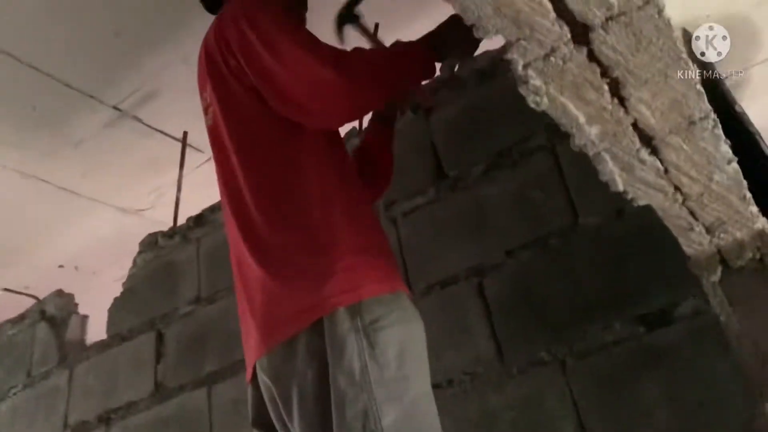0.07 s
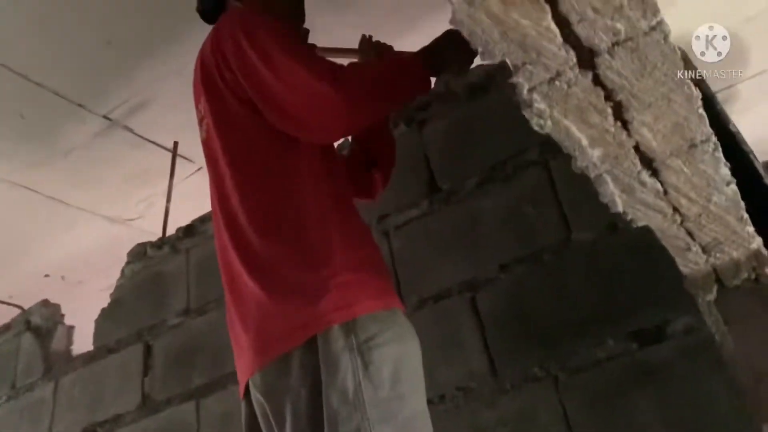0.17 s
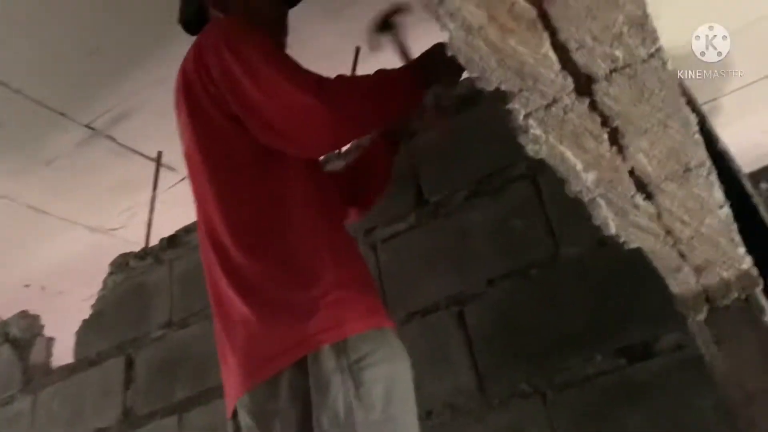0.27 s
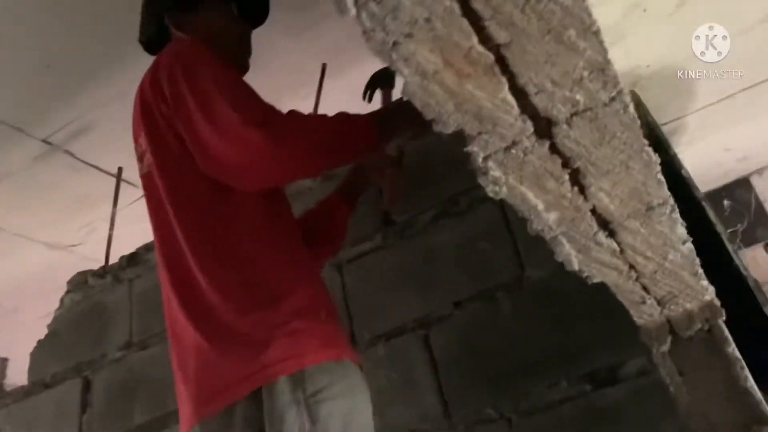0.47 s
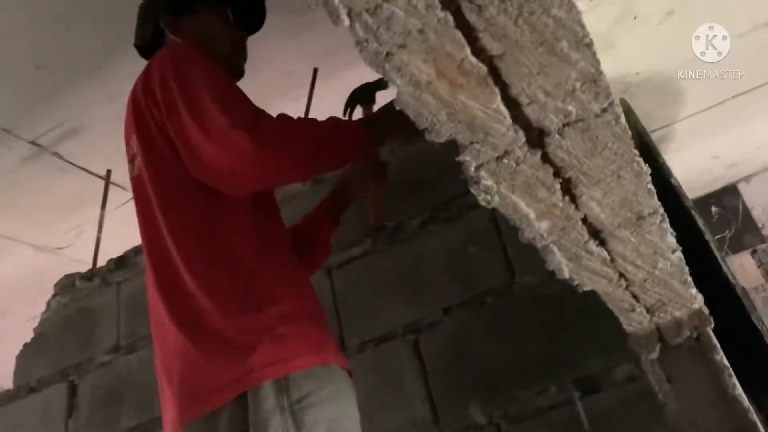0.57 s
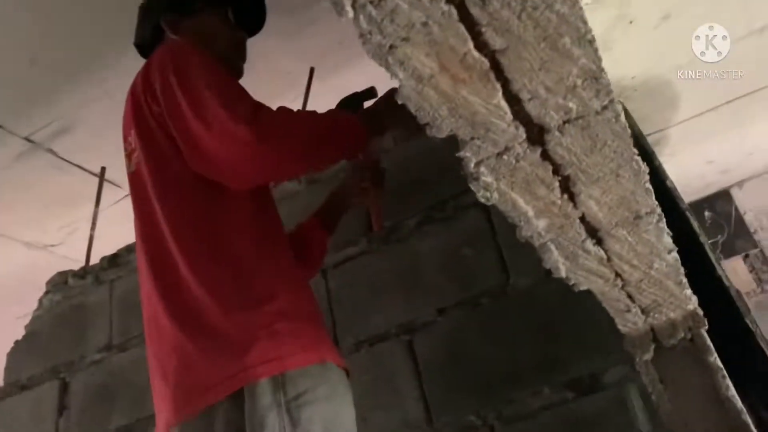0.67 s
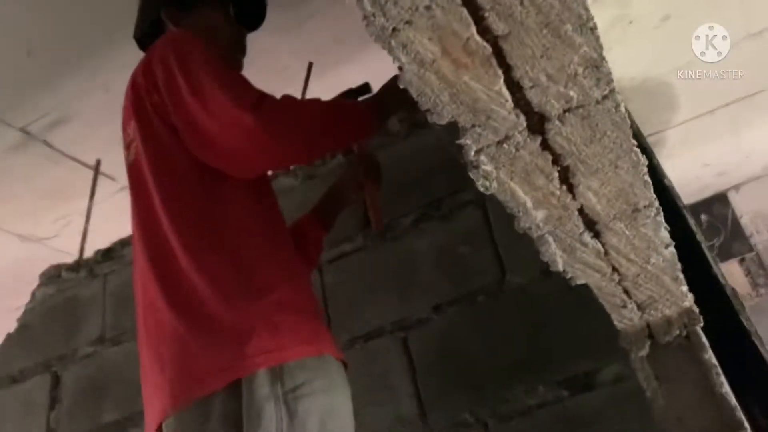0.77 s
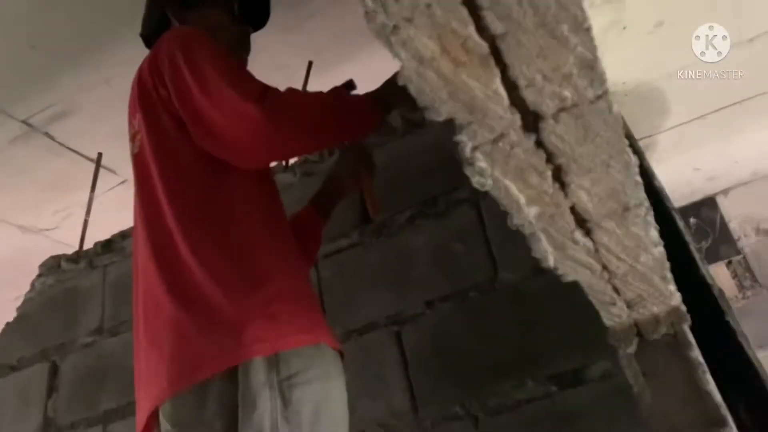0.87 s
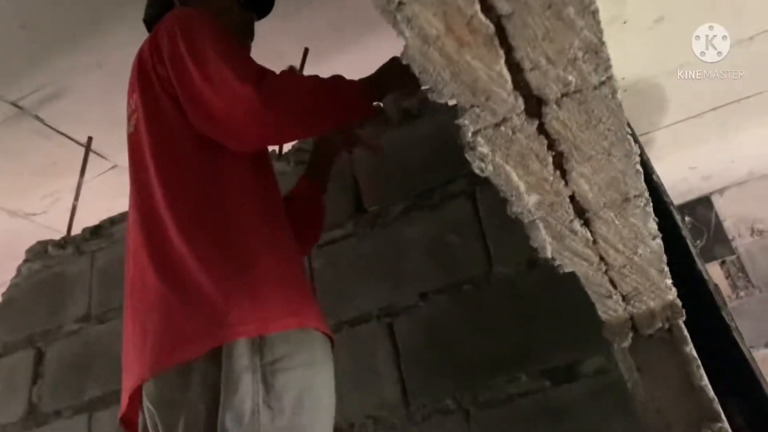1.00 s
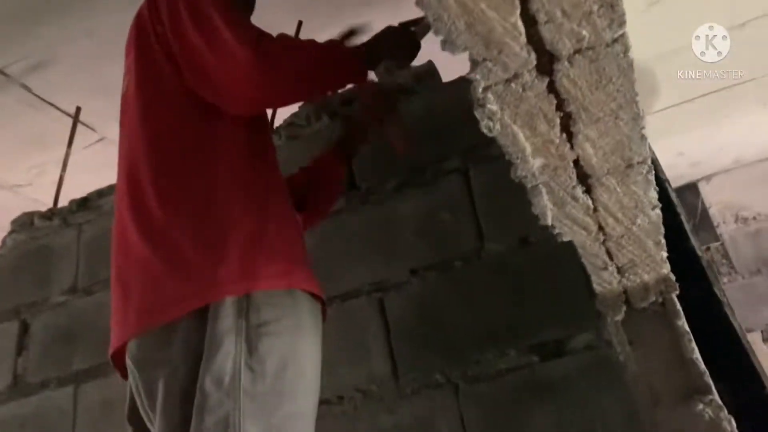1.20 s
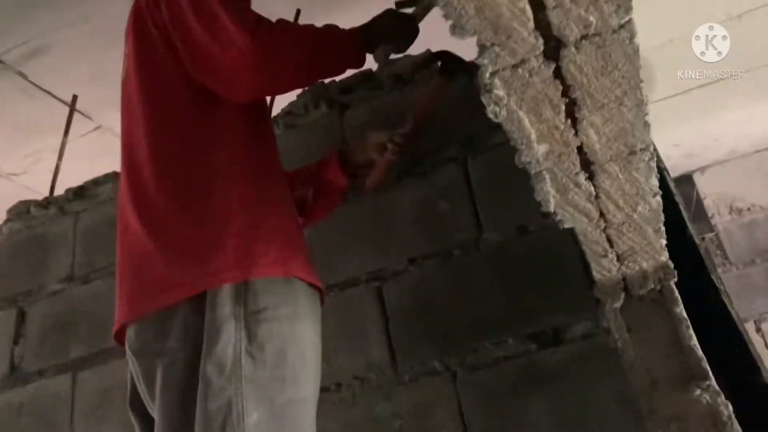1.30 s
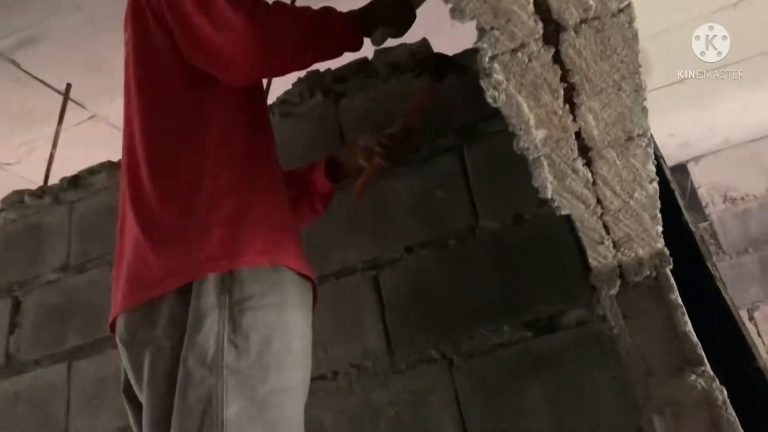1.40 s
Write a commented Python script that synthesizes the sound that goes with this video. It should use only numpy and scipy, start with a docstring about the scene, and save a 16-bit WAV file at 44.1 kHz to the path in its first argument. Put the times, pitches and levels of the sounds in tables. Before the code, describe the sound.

A hammer strikes a concrete-block wall twice up close, and chips and lumps trickle down.

```python
"""Two quick hammer blows break the top of a concrete-block wall, close by on a building site.
Mortar crunches in noise bursts, block and steel ring in decaying modes, the loosened block thuds.
Grit trickles, chips tick, lumps drop and crumble, a fragment falls into a hollow. Bare walls echo.
Behind it a far engine drones over a rumble and a thin whistle, perhaps an insect, swells twice."""
import sys
import numpy as np
from scipy import signal
from scipy.fft import rfft, irfft
from scipy.io import wavfile

SR = 44100
rng = np.random.default_rng(int(sys.argv[2]) if len(sys.argv) > 2 else 0)


def to_wav(sig):
    """Store sig (one row per channel, or 1-D mono) as 16-bit WAV at the path in sys.argv[1].

    Samples outside -1..1 are clipped; the rate is SR.
    """
    pcm = np.clip(np.atleast_2d(sig), -1, 1) * 32767
    pcm = np.round(pcm).astype(np.int16)
    wavfile.write(sys.argv[1], SR, pcm.T)  # frames by channels


N = 63945
TIME_S = np.arange(N) / SR
PORT_LAG_S, PORT_OWN_SHARE = 0.00017, 0.66  # left microphone port lags; uncorrelated share of power

# engine firing tone (time [s], frequency [Hz], level [dB])
ENGINE_TRACK = [(0, 90.4, -47), (.06, 85.7, -33.5), (.2, 79.5, -35), (.334, 80.6, -26.5),
                (.428, 81.5, -47.5), (.58, 83.16, -37), (.8, 79, -36), (1.1, 82.05, -37.5),
                (1.276, 79.4, -37), (1.45, 76.3, -33.5)]
# level curves (time [s], level [dB])
RUMBLE_LEVEL = [(0, -29), (.08, -33.5), (.2, -37), (.45, -32), (.62, -42.5), (1.1, -41.5), (1.45, -41)]
GRIT_LEVEL = [(0, -40.5), (.06, -58.5), (.12, -59.5), (.18, -57.5), (.26, -21), (.33, -45), (.42, -30.5),
              (.53, -44), (.57, -57.5), (.625, -45.5), (.652, -32.5), (.675, -38.5), (.71, -32), (.77, -42),
              (.815, -47), (.84, -32.5), (.99, -40), (1.06, -47.5), (1.17, -47.5), (1.25, -65.5),
              (1.32, -59), (1.38, -69), (1.45, -66.5)]
WHISTLE_LEVEL = [(0, -66), (.04, -50), (.075, -44.5), (.1, -52.5), (.125, -53), (.18, -84), (.39, -72),
                 (.44, -40.5), (.488, -41), (.525, -60), (.595, -58), (.64, -91)]
# blows (time [s], dull fracture [dB], bright crack [dB], block ring [dB], steel ring [dB], burst t60 [s])
HAMMER_BLOWS = [(0.2165, -3, -14, -2, -29, 0.039), (0.3663, -13, 0, -26, 1, 0.039)]
# shifts of the loosened block (time [s], level [dB], t60 [s])
BLOCK_SHIFTS = [(0.225, -25, 0.075), (0.369, -18, 0.24), (0.408, -21.5, 0.15), (0.488, -30, .15),
                (0.522, -28, 0.22)]
# chips snapping off, mortar lumps landing (time [s], level [dB], low-pass [Hz], t60 [s])
CHIP_HITS = [(0.249, -19, 12000, 0.014), (0.2563, -20, 12500, 0.0034), (0.2788, -18, 15000, 0.014),
             (0.459, -27.5, 11100, 0.058), (0.649, -24.5, 13800, 0.057), (0.7205, -16.5, 5960, 0.018),
             (0.768, -31.5, 15500, 0.013), (0.829, -28.5, 4650, 0.078), (0.842, -28.5, 11900, 0.043),
             (0.8585, -27.5, 13800, 0.013), (0.9684, -21, 14070, 0.022), (0.9905, -24, 15600, 0.038),
             (1.277, -56, 14920, 0.021)]
LUMP_HITS = [(0.325, -29, 2570, 0.059), (0.515, -31.5, 1860, 0.13), (0.721, -28.5, 6040, 0.033),
             (0.858, -30.5, 2114, 0.023), (0.8875, -19.5, 5950, 0.039), (0.8985, -28, 3964, 0.078),
             (0.9235, -19.5, 2890, 0.035), (0.929, -23.5, 2570, 0.016), (0.9345, -30, 2360, 0.027),
             (0.969, -30, 2000, 0.047), (0.999, -31, 2990, 0.088), (1.135, -46, 2550, 0.029),
             (1.205, -45.5, 2394, 0.1)]
# lumps breaking up (time [s], length [s], level [dB], first pitch [Hz], last pitch [Hz])
LUMP_BREAKUPS = [(0.888, .035, -21.5, 1130, 267), (0.922, .04, -26.5, 457, 268)]
# noise spectra (frequency [Hz], gain [dB])
RUMBLE_SPECTRUM = [(20, -10.5), (45, 1.5), (65, 0), (120, 4), (170, -0.5), (250, -16), (420, -12),
                   (700, -22.5), (1500, -37), (4000, -41.5), (16000, -63)]
GRIT_SPECTRUM = [(200, -12.5), (900, -3.5), (1700, -1.5), (4000, 0), (7000, 1), (8400, -14), (10000, 4),
                 (12000, -1), (13500, -6.5), (15500, 0)]
FRACTURE_SPECTRUM = [(100, -27), (300, -15), (550, 2.5), (900, 0.5), (1200, 2), (1800, 7), (2600, -1.5),
                     (3300, 4), (5100, -4), (5900, -9.5), (7700, -11.5), (11000, -12.5), (16000, -22.5)]
CRACK_SPECTRUM = [(80, -4), (250, -2), (620, -5), (900, 6), (1200, -6.5), (2200, 2.5), (2900, -2),
                  (4500, 4), (7500, -3), (10500, -5.5), (12200, -5), (16000, -2)]
THUD_SPECTRUM = [(70, -24.5), (150, -6.5), (260, -6), (335, 1), (430, -2), (800, -16.5), (2000, -39)]
CHIP_SPECTRUM = [(200, -36), (1200, -25.5), (3000, -9), (4000, 1), (6500, -0.5), (8400, -3), (11000, 7.5),
                 (13500, -4.5), (16000, 6.5)]
LUMP_SPECTRUM = [(100, -12.5), (280, -9.5), (900, 3.5), (1500, -1.5), (1900, -3.5), (3400, 2), (5000, -6.5),
                 (8000, -34), (16000, -34)]
# resonant modes (frequency [Hz], relative level [dB], t60 [s])
BLOCK_MODES = [(623, -13.5, 0.064), (1162, -12, 0.05), (1824, -13, 0.038), (3430, -2.5, .028),
               (3275, 2.5, 0.028), (3607, -10.5, 0.074), (4475, -5.5, 0.045), (4934, 1.5, .022),
               (5120, -5.5, .033), (6450, -7, .04)]
STEEL_MODES = [(887.6, -9, 0.065), (1785, -11, 0.03), (2360, -4, 0.044), (3461, -2.5, 0.038),
               (5020, -12.5, 0.044), (6148, -22, .08), (9510, -4.5, 0.034), (9700, -7.5, .035),
               (10360, -3, 0.064), (10990, 4, 0.023), (12840, -3.5, .022), (14800, -7.5, 0.017)]
FRAGMENT_MODES = [(1040, -3.5, 0.021), (1390, -0.5, .032)]
HOLLOW_MODES = [(444, 0, 0.066), (551, 7, 0.052), (613, 1, .055)]
# reflections off the near wall and beam (delay [s], gain [dB])
NEAR_REFLECTIONS = [(.0057, -19.5), (.0083, -18.5), (0.0134, -16.5)]
# diffuse wall echo (band centre [Hz], gain [dB], t60 [s])
WALL_BANDS = [(99.1, -10.5, 0.22), (350, -2.5, 0.45), (760, -8.5, 0.14), (1920, -6.5, 0.085),
              (5000, -7.5, 0.14), (9930, -9.5, 0.12), (16000, -13.5, 0.12)]


def undb(db):
    return 10 ** (np.asarray(db) / 20)


def unit_rms(x):
    return x / np.sqrt(np.mean(x ** 2) + 1e-20)


def unit_hit(x):
    """Scale to the energy of 4 ms at rms 1."""
    return x * np.sqrt(0.004 * SR / (np.mean(np.sum(x ** 2, axis=-1)) + 1e-20))


def curve(rows, column=1):
    """Table column, interpolated over time."""
    rows = np.array(rows, float)
    return np.interp(TIME_S, rows[:, 0], rows[:, column])


def wander(rate_hz):
    """Random drift, spread near 1."""
    points = rng.standard_normal(4000)
    return np.interp(TIME_S * rate_hz, np.arange(len(points)), points)


def decay(start_s, t60_s):
    """10-sample onset, exponential fall."""
    age_s = np.maximum(TIME_S - start_s, 0)
    return np.clip(age_s * SR / 10, 0, 1) * np.exp(-np.log(1000) * age_s / t60_s)


def colour(x, spectrum, lowpass_hz=None):
    """Minimum-phase filter, optional treble roll-off."""
    taps = 4096
    bins_hz = np.maximum(np.fft.rfftfreq(taps, 1 / SR), 1)
    hz, db = np.array(spectrum, float).T
    gain = undb(np.interp(np.log(bins_hz), np.log(hz), db))
    if lowpass_hz:
        gain = gain / np.sqrt(1 + (bins_hz / lowpass_hz) ** 6)
    cepstrum = irfft(np.log(gain))
    cepstrum[1:taps // 2] *= 2
    cepstrum[taps // 2 + 1:] = 0
    impulse = irfft(np.exp(rfft(cepstrum)))
    return signal.fftconvolve(x, impulse[None], axes=1)[:, :N]


def delay(x, delay_s):
    return np.pad(x, (round(delay_s * SR), 0))[:N]


def ports(noises):
    """Rows (common, left, right) to stereo; the common row lags on the left."""
    common = np.array([delay(noises[0], PORT_LAG_S), noises[0]])
    return np.sqrt(1 - PORT_OWN_SHARE) * common + np.sqrt(PORT_OWN_SHARE) * noises[1:]


def burst(envelope, spectrum, lowpass_hz=None, crunch_db=0.5):
    """Cluster of tiny fractures: uneven noise under one envelope."""
    crunch = undb(crunch_db * wander(1100))
    noise = ports(rng.standard_normal((3, N)))
    return unit_hit(colour(noise * envelope * crunch, spectrum, lowpass_hz))


def ring(start_s, modes, build_cycles=0):
    """Modes struck together, at once or swelling over build_cycles."""
    age_s = TIME_S - start_s - np.array([[PORT_LAG_S], [0]])
    phases_turns = 0.38 * rng.uniform(-1, 1, (len(modes), 2, 1))
    out = 0
    for (hz, db, t60_s), turns in zip(modes, phases_turns):
        swell = np.clip(hz * age_s / build_cycles, 0, 1) if build_cycles else 1
        out += undb(db) * swell * decay(start_s, t60_s) * np.sin(2 * np.pi * (hz * age_s + turns))
    return unit_hit(out)


def engine(jitter=0.022, octave_db=-21, waver_db=1.5):
    """Far engine: unsteady firing tone plus its octave."""
    firing_hz = curve(ENGINE_TRACK) * (1 + jitter * wander(23))
    phase = 2 * np.pi * np.cumsum(firing_hz) / SR
    tone = unit_rms(np.sin(phase) + undb(octave_db) * np.sin(2 * phase))
    return tone * undb(curve(ENGINE_TRACK, column=2) + waver_db * wander(18))


def rumble():
    """Distant low noise, most alike between ports in the bass."""
    mid, side = colour(rng.standard_normal((2, N)), RUMBLE_SPECTRUM)
    side = colour(side[None], [(60, -14.5), (150, -4.5), (300, -2)]) * np.array([[1], [-1]])
    return unit_rms(mid + side) * undb(curve(RUMBLE_LEVEL))


def grit(grains_per_s=3300, spread_db=2.5, waver_db=3):
    """Sand grains of uneven size slide down the block face."""
    hits = rng.random((3, N)) < grains_per_s / SR
    size_db = spread_db * np.minimum(rng.exponential(size=(3, N)), 5)
    grains = hits * undb(size_db) * rng.standard_normal((3, N))
    flow = undb(curve(GRIT_LEVEL) + waver_db * wander(82))
    return unit_rms(colour(ports(grains), GRIT_SPECTRUM)) * flow


def whistle(pitch_hz=4890, jitter=0.004, waver_db=8.5):
    """Thin tone, two swells; the level wavers separately in each port."""
    phase = 2 * np.pi * np.cumsum(pitch_hz * (1 + jitter * wander(140))) / SR
    level_db = curve(WHISTLE_LEVEL) + waver_db * np.array([wander(60), wander(78)])
    return np.sqrt(2) * np.sin(phase) * undb(level_db)


def hammer(crush_s=0.0065, crush_db=-13, recoil_s=0.013, recoil_db=-5):
    """Each blow crushes the surface, cracks the block, chatters once, rings block and steel."""
    out = 0
    for start_s, dull_db, bright_db, block_db, steel_db, t60_s in HAMMER_BLOWS:
        crush = np.sqrt(np.clip(1 + (TIME_S - start_s) / crush_s, 0, 1)) * (TIME_S < start_s)
        strike = undb(crush_db) * crush + decay(start_s, t60_s)
        chatter = undb(recoil_db) * decay(start_s + recoil_s, t60_s / 2)
        out += undb(dull_db) * burst(strike, FRACTURE_SPECTRUM)
        out += undb(bright_db) * burst(strike + chatter, CRACK_SPECTRUM)
        out += undb(block_db) * ring(start_s, BLOCK_MODES)
        out += undb(steel_db) * ring(start_s, STEEL_MODES)
    return out


def thuds():
    """The loosened block shifts and booms through the wall."""
    return sum(undb(db) * burst(decay(start_s, t60_s), THUD_SPECTRUM)
               for start_s, db, t60_s in BLOCK_SHIFTS)


def debris(hits, spectrum):
    """Short dead knocks of broken pieces."""
    return sum(undb(db) * burst(decay(start_s, t60_s), spectrum, lowpass_hz)
               for start_s, db, lowpass_hz, t60_s in hits)


def fragment():
    """A fragment clacks on a block's rim, then drops into its hollow."""
    clack = undb(-28) * ring(start_s=0.768, modes=FRAGMENT_MODES)
    hollow = undb(-25) * ring(start_s=0.771, modes=HOLLOW_MODES, build_cycles=5)
    return clack + hollow


def crumble(start_s, length_s, first_hz, last_hz, pieces=40, t60_cycles=12, scatter_oct=0.45):
    """A lump falls apart: dense knocks, falling in pitch from small pieces to big."""
    out = 0
    for k, (offset, detune, left, right) in enumerate(rng.random((pieces, 4))):
        progress = (k + offset) / pieces
        hit_s = start_s + progress * length_s
        hz = first_hz * (last_hz / first_hz) ** progress * 2 ** (scatter_oct * (2 * detune - 1))
        knock = np.sqrt(hz) * decay(hit_s, t60_cycles / hz) * np.sin(2 * np.pi * hz * (TIME_S - hit_s))
        port_gains = 2 * np.array([[left], [right]]) - 1
        out += knock * port_gains
    return unit_hit(out)


def reflections(x):
    """Near surfaces answer within milliseconds, left and right swapped."""
    return sum(undb(db) * np.array([delay(port, delay_s) for port in x[::-1]])
               for delay_s, db in NEAR_REFLECTIONS)


def wall_echo(x, predelay_s=0.003, build_s=0.0018, build_cycles=2.1):
    """Diffuse echo off bare masonry; lows gather later and last longest."""
    log_hz = np.log(np.maximum(np.fft.rfftfreq(N, 1 / SR), 1))
    log_centres = np.log([row[0] for row in WALL_BANDS])
    noise_bins = rfft(rng.standard_normal((2, N)))
    age_s = np.maximum(TIME_S - predelay_s, 0)
    impulse = 0
    for selector, (hz, db, t60_s) in zip(np.eye(len(WALL_BANDS)), WALL_BANDS):
        band = irfft(noise_bins * np.interp(log_hz, log_centres, selector), N)
        build = 1 - np.exp(-age_s / (build_s + build_cycles / hz))
        tail = build * decay(0, t60_s)
        impulse += undb(db) * band * tail / np.sqrt(np.sum(tail ** 2))
    return signal.fftconvolve(x, impulse, axes=1)[:, :N]


def scene():
    """Blows and debris among bare walls, over the distant drone."""
    knocks = fragment() + thuds()
    crumbs = sum(undb(db) * crumble(start_s, length_s, first_hz, last_hz)
                 for start_s, length_s, db, first_hz, last_hz in LUMP_BREAKUPS)
    heavy = hammer() + knocks + crumbs + debris(LUMP_HITS, LUMP_SPECTRUM)
    work = heavy + reflections(heavy) + debris(CHIP_HITS, CHIP_SPECTRUM) + grit()
    tone = whistle()
    echo = wall_echo(work + undb(-7.5) * tone)
    return work + tone + echo + engine() + rumble()


def record(dry):
    """Gain, hard clip, steep low-pass."""
    gain_db, cutoff_hz = -6, 15900
    lowpass = signal.ellip(10, 0.2, 70, cutoff_hz, fs=SR, output="sos")
    return signal.sosfilt(lowpass, np.clip(dry * undb(gain_db), -1, 1))


dry = scene()
out = record(dry)
to_wav(out)
```